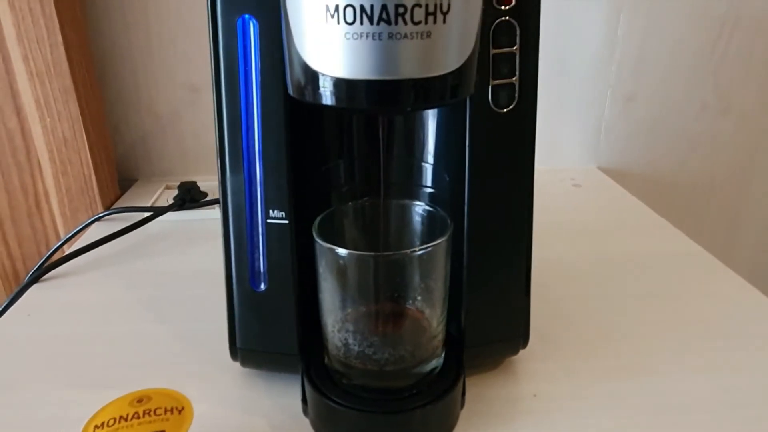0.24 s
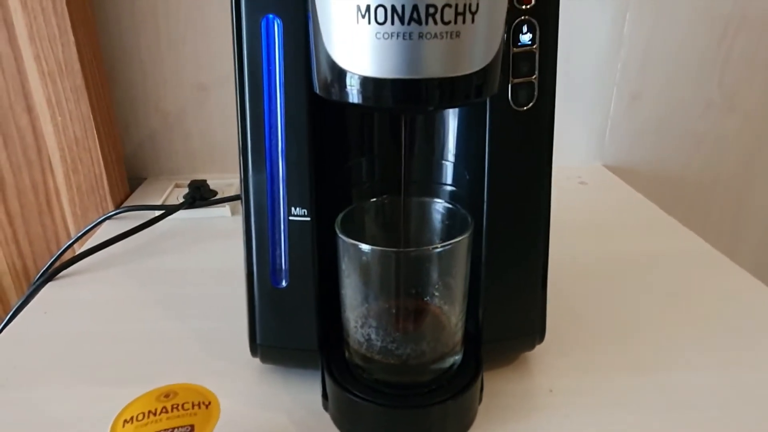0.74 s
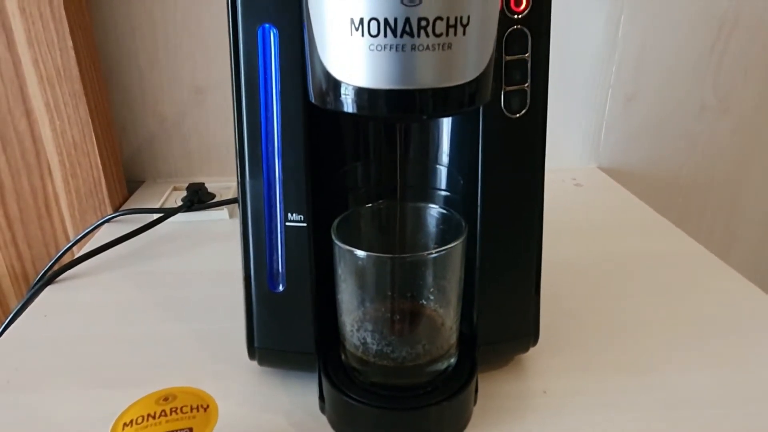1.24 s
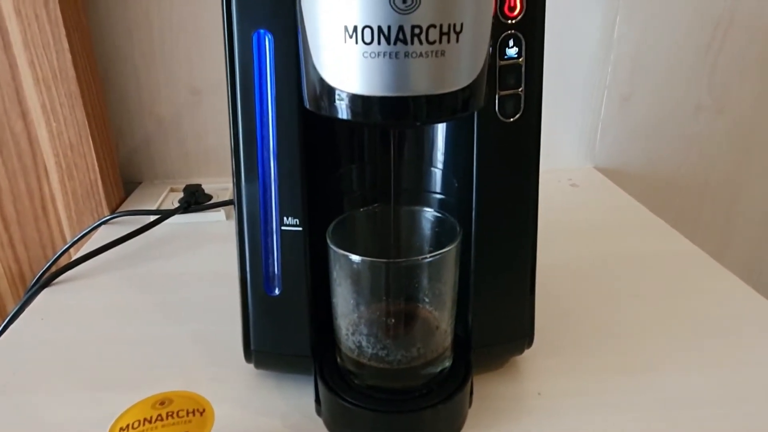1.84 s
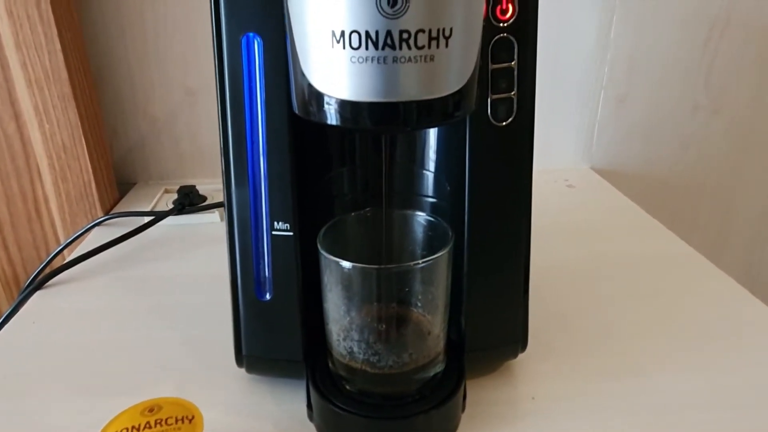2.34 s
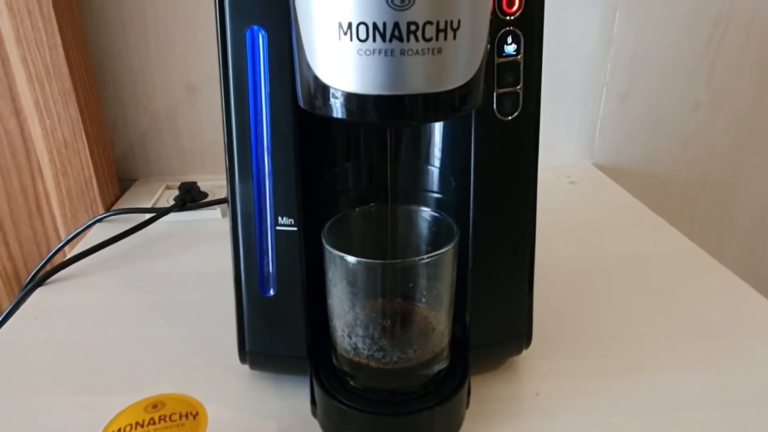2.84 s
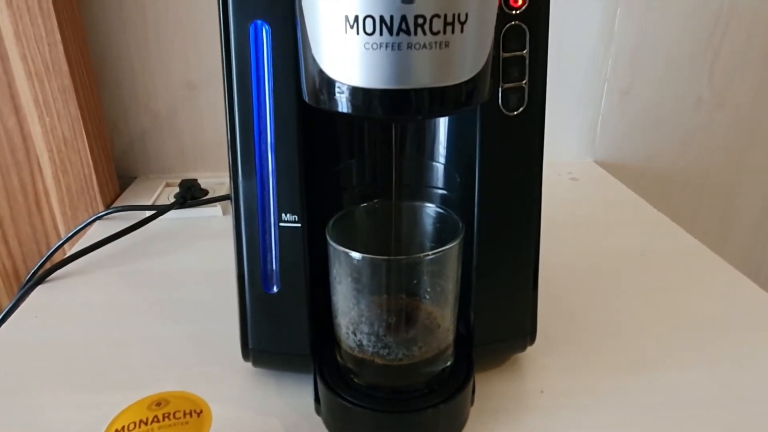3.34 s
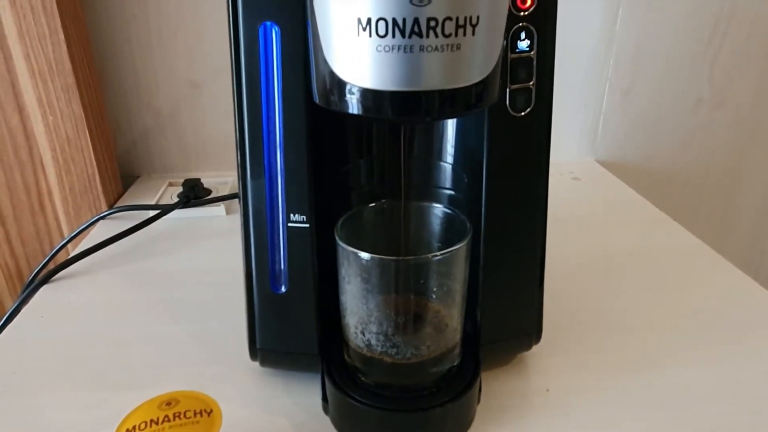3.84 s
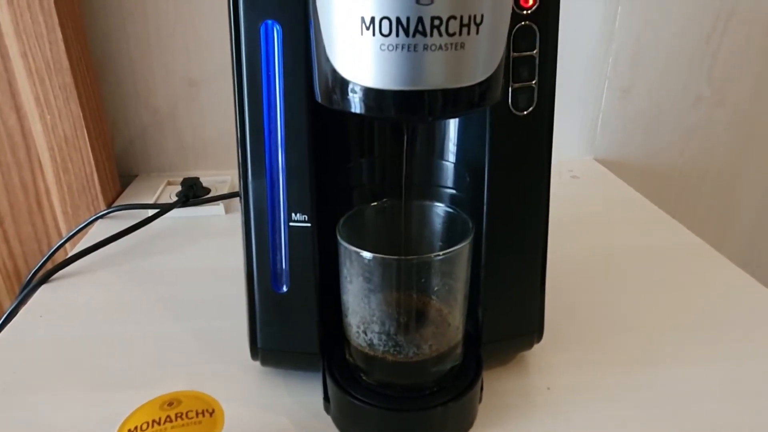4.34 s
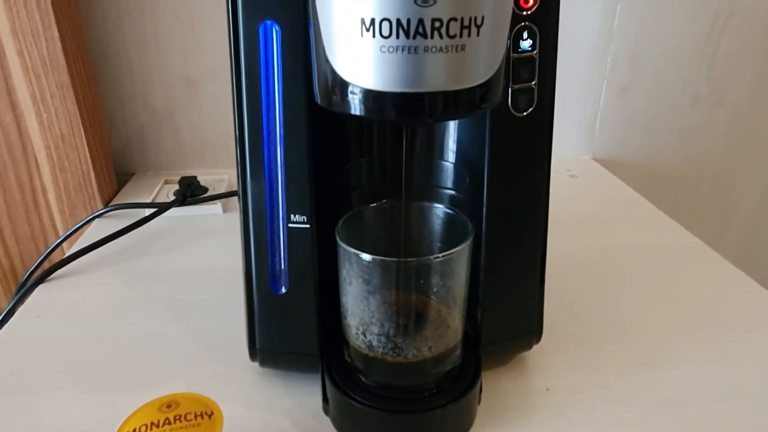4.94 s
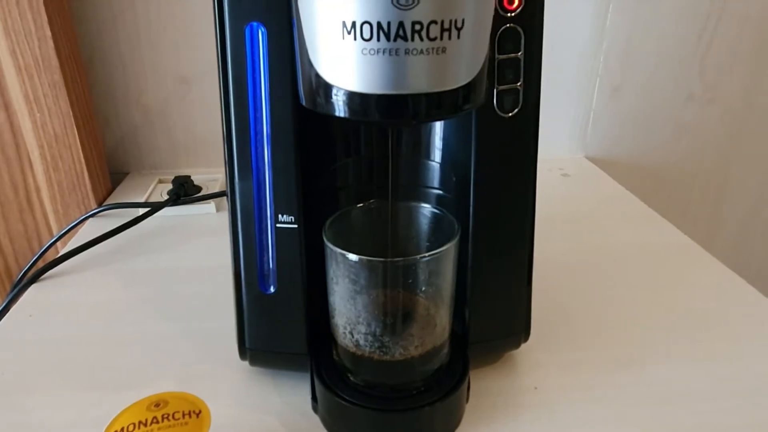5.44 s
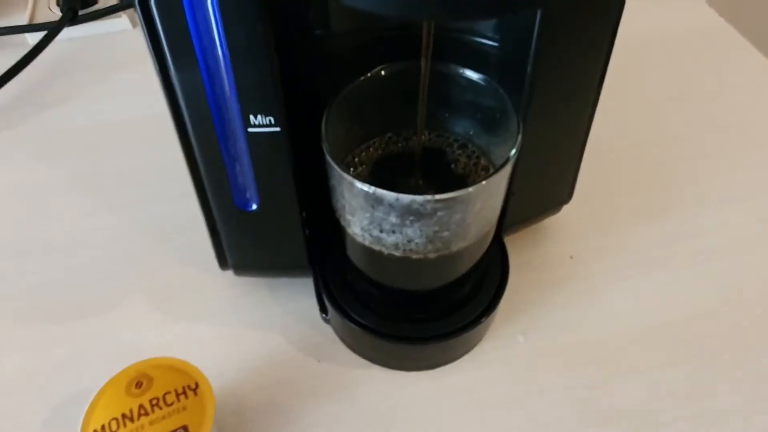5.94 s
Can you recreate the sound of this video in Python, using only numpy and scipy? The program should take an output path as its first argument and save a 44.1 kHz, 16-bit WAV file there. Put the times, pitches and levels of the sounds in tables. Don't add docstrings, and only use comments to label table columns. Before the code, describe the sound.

From 0 s, already running, a coffee machine's pump hums at a steady low pitch around 100 Hz with buzzy overtones, slightly wavering, over a soft low casing rumble. A thin stream rushes and hisses quietly into a glass. In the first second it is mostly sharp, bright spits and glassy ticks, with a strong tick near 0.4 s and another near 0.8 s. From 1 to 2.5 s scattered hollow bubble blips and small high plinks join. Around 2.8 to 3.5 s the bubbling thickens into ringing, rounded plops; a loud one comes near 4.3 s, and from 5.3 s they crowd into lively gurgling, strongest around 5.8 s, while fine crackle thins. At about 5.9 s the listening position jumps closer and lower, so hum and rumble swell suddenly, continuing with bubbles to the end just past 6 s. Close stereo, short kitchen reverberation.

```python
import sys
import numpy as np
from scipy import signal
from scipy.fft import rfft, irfft, next_fast_len
from scipy.io import wavfile

SR = 44100
rng = np.random.default_rng(int(sys.argv[2]) if len(sys.argv) > 2 else 0)


def nominal_scale(level):
    x = np.asarray(level, float) / 20
    return 10 ** x


def dump(signal):
    limited = np.clip(np.atleast_2d(signal).T, -1, 1)
    pcm = np.round(limited * 32767).astype(np.int16)
    wavfile.write(sys.argv[1], SR, pcm)


N = 272634


def rms_one(x):
    return x / np.sqrt(np.mean(x ** 2) + 1e-20)


def at_hz(points, hz):
    table_hz, values = np.array(points).T
    return np.interp(np.log(hz), np.log(table_hz), values)


def drift(rate_hz):
    r = np.exp(-80 * np.pi * rate_hz / SR)
    slow = signal.lfilter([1], [1, -2 * r, r * r], rng.standard_normal(N // 40 + 2002))
    slow = rms_one(slow[2000:])
    return np.interp(np.arange(N) / 40, np.arange(len(slow)), slow)


def resonate(x, hz, width_hz):
    r = np.exp(-np.pi * width_hz / SR)
    zeros = (1 - r * r) / 2 * np.array([1, 0, -1])
    poles = [1, -2 * r * np.cos(2 * np.pi * hz / SR), r * r]
    return signal.lfilter(zeros, poles, x + 1e-18)


def delay(x, ms):
    at = np.arange(N)
    return np.interp(at - ms * SR / 1000, at, x)


def add(track, s, shape):
    i = min(max(round(s * SR), 0), N)
    track[i:i + len(shape)] += shape[:N - i]


def after_change():
    change_s, change_time_s = 5.89, 0.023
    return np.clip((np.arange(N) / SR - change_s) / change_time_s + .5, 0, 1)


# multiple of mains, left in dB, right in dB, left lead in rad, gain after the change in dB
HUM = [(2, -34.2, -35.1, -0.02, 6), (3, -53.1, -56.2, 0.25, 11), (4, -34.8, -33.9, -0.13, 3),
       (5, -39.8, -40.5, -0.18, 1), (6, -53.1, -51.7, -0.7, 8), (7, -62.1, -58.7, -0.57, 14),
       (9, -52.5, -54.4, 1.66, -3), (10, -45.8, -50.5, -0.38, 2), (11, -47.3, -53.7, -1.02, 8),
       (12, -66.1, -58.5, 0.22, 6), (13, -65.0, -60.9, 0.91, 6), (14, -71.8, -54.3, -1.24, 9),
       (15, -58.9, -54.7, -0.75, 2), (16, -65.4, -56.7, -2.07, 6), (17, -66.9, -62.4, -0.54, 17)]


def pump():
    mains_hz, stroke_s = 49.97, 0.003474
    t, out, changed = np.arange(N) / SR, np.zeros((2, N)), after_change()
    for k, left_db, right_db, lead, changed_db in HUM:
        phase = 2 * np.pi * k * mains_hz * (t - stroke_s) + 0.052 * k * drift(2.85)
        phase += (k > 5) * rng.uniform(0, 2 * np.pi) + 0.303 * (k - 2) ** 2 * changed
        level = np.sqrt(2) * nominal_scale(min(changed_db, 6) * changed + 0.28 * k * drift(6.4))
        out[0] -= nominal_scale(left_db) * level * np.cos(phase)
        out[1] -= nominal_scale(right_db) * level * np.cos(phase - lead)
    return out


# delay in ms, level in dB.
PATHS = [
    [(.3, -15), (.71, 3), (1.33, -11), (3.1, -23)],
    [(0, -5.5), (.83, 3.5), (1.94, 4), (4.2, -4)],
]


def to_ports(x):
    return np.array([sum(nominal_scale(level_db) * delay(x, ms) for ms, level_db in side) for side in PATHS])


def bubble(hz, cycles, rise, attack_cycles):
    turn = np.arange(int(.05 * SR)) * hz / SR
    fade = (1 - np.exp(-turn / attack_cycles)) ** 2 * nominal_scale(-60 * (turn / cycles) ** 1.24)
    return fade / fade.max() * np.sin(2 * np.pi * turn * (1 + rise * turn / cycles))


# start in s, peak in dB, pitch in Hz, life in cycles.
GLUGS = [(2.79, -25.5, 1176, 16), (3.074, -15, 1270, 8.5), (3.149, -25, 1210, 10.9),
         (3.378, -16, 1090, 11.5), (3.79, -25.5, 1035, 12), (3.993, -24.5, 970, 11),
         (4.161, -21.5, 1100, 18), (4.301, -25.5, 1070, 16.3), (4.343, -12.5, 1120, 12),
         (4.481, -18.5, 1110, 7.4), (4.544, -26.5, 1180, 30), (4.701, -27, 1082, 26.5),
         (4.978, -15, 1110, 11), (5.065, -22.5, 824, 9.9), (5.329, -18, 953, 16), (5.375, -20, 1180, 7.8),
         (5.423, -15, 1130, 7.1), (5.466, -19, 1217, 15), (5.504, -19, 1010, 13), (5.527, -20.5, 1120, 16),
         (5.585, -18, 1010, 16), (5.605, -17, 1050, 22), (5.743, -14.5, 1180, 11), (5.819, -11.5, 1043, 26),
         (5.8685, -17, 1030, 14), (5.884, -16.5, 1060, 17), (5.898, -18.5, 1120, 8.7),
         (5.93, -21.5, 950, 13), (6.046, -24, 1130, 9), (6.062, -15.5, 1050, 7.9)]
# start in s, peak in dB.
RINGERS = [(1.075, -26.5), (1.213, -32.5), (1.634, -27), (1.748, -23), (1.777, -16.5), (2.444, -19.5),
           (2.586, -33), (2.78, -26.5), (2.811, -16.5), (2.825, -18.5), (2.879, -26.5), (2.922, -20.5),
           (2.956, -19), (3.019, -19.5), (3.091, -19), (3.443, -22.5), (3.515, -24.5), (3.577, -29),
           (3.64, -28.5), (3.821, -19.5), (3.841, -21.5), (3.947, -24.5), (4.403, -19), (4.87, -22.5),
           (5.141, -20.5), (5.178, -20), (5.223, -26.5), (5.487, -15), (5.626, -20.5), (5.765, -28)]
# start in s, peak in dB, pitch in Hz.
FAINT_BUBBLES = [(1.04, -38, 1520), (2.302, -31.5, 1550), (2.356, -35, 1540), (2.522, -31, 1217), (2.67, -31, 1100),
                 (2.897, -30, 1106), (2.988, -31.5, 1460), (3.041, -29, 1243), (3.175, -33, 1390),
                 (3.41, -32.5, 1123), (3.5, -35, 1270), (3.731, -30, 1180), (3.935, -33, 1520), (4.142, -35, 1520),
                 (4.239, -26.5, 1020), (4.325, -31, 1040), (4.403, -30, 810), (4.59, -28, 1130), (4.734, -27, 1095),
                 (4.773, -30, 1130), (4.941, -28.5, 962), (5.26, -32, 1520), (5.323, -22, 950), (5.55, -29, 1120),
                 (5.569, -26, 1100), (5.649, -25.5, 1000), (5.673, -28.5, 1440), (5.719, -33, 1550),
                 (6.009, -28, 1060), (6.101, -32, 1010), (1.076, -34, 1900), (1.214, -37, 1900), (1.314, -37, 1900),
                 (1.634, -31, 1920), (1.778, -28, 1170), (2.11, -37, 1880), (3.09, -33, 2050), (3.444, -32, 1950),
                 (4.43, -31, 960), (4.452, -33, 960), (4.711, -26, 1020), (5.02, -32, 1220), (5.143, -31, 1920),
                 (5.355, -31, 900), (5.91, -35, 1930), (6.165, -33, 2000)]
# start in s, peak in dB.
MURMURS = [(1.1059, -41), (1.294, -38), (1.3135, -36), (1.3738, -45), (1.4401, -45), (1.7986, -39),
           (1.924, -48), (2.1944, -37), (2.2443, -46), (2.4743, -37), (2.594, -31), (2.7155, -35),
           (2.7716, -32), (3.237, -33), (3.2546, -32), (3.3448, -42), (3.3822, -28), (3.3994, -32),
           (3.9, -35), (4.123, -36), (4.1656, -32), (4.437, -38), (4.4598, -34), (4.4817, -40),
           (4.7331, -37), (4.7596, -34), (4.791, -32), (4.8194, -37), (4.8918, -34), (5.0883, -40),
           (5.4258, -30), (5.8825, -36), (6.1604, -41)]


def large_bubbles(pops):
    large = [*GLUGS, *[(s, peak_db, 1463, 9.4) for s, peak_db in RINGERS]]
    shed = []
    for (s, peak_db, hz, _), (wait, size, pitch) in zip(large, rng.random((len(large), 3))):
        shed.append((s + .05 * (0.1176 + wait), peak_db - 14 - 5 * size, hz * (.85 + .2 * pitch), 14))
    faint = [(*row, 15.3) for row in FAINT_BUBBLES]
    murmurs = [(s, peak_db, 1620, 11.7) for s, peak_db in MURMURS]
    for s, peak_db, hz, cycles in [*large, *shed, *faint, *murmurs]:
        ring = bubble(0.924 * hz, max(cycles, 3), rise=0.17, attack_cycles=1.1)
        add(pops, s - .0008, nominal_scale(peak_db - 2.0) * ring)


# start in s, peak in dB, pitch in Hz.
PLINKS = [(0.21, -36.5, 3000), (0.5426, -32, 3140), (0.667, -37, 3130), (0.8844, -35, 2800),
          (0.974, -27, 2860), (1.632, -31.5, 2980), (1.834, -24.5, 2863), (2.012, -36, 3130),
          (2.111, -27, 3580), (2.3496, -34, 4000), (2.594, -35, 3700), (3.042, -25, 3210),
          (3.2552, -27.5, 3800), (3.3445, -32.5, 3180), (3.411, -30, 3300), (3.445, -22.5, 3356),
          (3.8195, -34.5, 3710), (3.951, -32.5, 3080), (4.2904, -32, 2730), (4.6456, -30.5, 2886),
          (4.788, -32, 3820), (5.128, -22, 3400), (5.2083, -28, 3160), (5.2625, -30.5, 3500),
          (5.3744, -31, 3190), (5.3994, -32, 3260), (5.467, -33.5, 3760), (5.5682, -32, 3370),
          (5.7019, -31.5, 3600), (5.8177, -34, 3600)]
# start in s, peak in dB, pitch in Hz.
BEADS = [(0.3102, -35, 3060), (0.3651, -38.5, 3760), (0.825, -43, 2770), (1.074, -35, 2590),
         (1.1307, -37, 3190), (1.4336, -37, 3170), (1.4526, -39.5, 3070), (1.4825, -34, 2590),
         (1.6229, -35, 3160), (1.7474, -36, 2940), (1.8026, -36, 3670), (2.2648, -34, 3200),
         (2.3082, -42, 3560), (2.81, -38, 2800), (2.9552, -34, 2970), (3.0191, -37, 2970),
         (3.2385, -36, 3920), (3.6825, -37.5, 3220), (3.9729, -34, 3300), (4.0332, -42, 2820),
         (4.1175, -42, 3010), (4.4029, -41, 2970), (4.5089, -39, 2990), (4.7132, -39, 3460),
         (4.7725, -36, 3060), (4.8692, -36, 2950), (5.6495, -33.5, 3680), (5.7648, -35, 3200),
         (5.887, -39, 3120), (6.0449, -37, 3400)]


def small_bubbles(pops):
    beads = [(s, peak_db - 1.5, hz) for s, peak_db, hz in BEADS]
    for s, peak_db, hz in [*PLINKS, *beads, (3.446, -27, 4300)]:
        add(pops, s, nominal_scale(peak_db + 3.0) * bubble(0.949 * hz, 18.7, rise=0.22, attack_cycles=0.33))


def bubble_patter(pops):
    for when, pitch, size in rng.random((600, 3)):
        s = when ** .7 * N / SR
        peak_db = -52.5 + 1.57 * s - 4.8 * np.log(size + 0.02)
        add(pops, s, nominal_scale(peak_db) * bubble(900 * 4.5 ** pitch ** 2.2, 5.7, rise=0.07, attack_cycles=0.66))


# pitch in Hz, width in Hz, left in dB, right in dB.
BAY = [(787, 31, 1, 7.5), (1011, 45, -35, 1.5), (1180, 153, -1, -1), (1520, 85, 3.5, 11),
       (1862, 80, 5.5, 9), (2860, 78.4, 6, -13), (3190, 130, -12, 6.5), (3600, 190, 0.5, -13),
       (4180, 41, -2, -7.5)]


def gurgle():
    pops = np.zeros(N)
    large_bubbles(pops)
    small_bubbles(pops)
    bubble_patter(pops)
    churn_db, flicker_db = -52, 5.5
    stirred = pops + nominal_scale(churn_db + flicker_db * drift(31)) * rng.standard_normal(N)
    ring = np.zeros((2, N))
    for hz, width_hz, left_db, right_db in BAY:
        ring += resonate(stirred, hz, width_hz) * nominal_scale([[left_db], [right_db]])
    late = delay(pops, 0.22)
    left = late - 0.21 * resonate(late, 900, 400)
    return nominal_scale(-3.5) * np.array([left, pops]) + ring + nominal_scale(-13.5) * to_ports(pops), pops


def spit(noise, hz, treble_db, ms):
    age = np.arange(len(noise)) / (ms * SR / 1000)
    slow = age * nominal_scale(0.18 * (treble_db + 2))
    high = signal.butter(4, 2000 + 0.39 * hz, "high", fs=SR, output="sos")
    tick = signal.sosfilt(high, noise * age ** 2 * np.exp(-2.2 * age))
    puff = noise * slow ** 2 * np.exp(-1.7 * slow)
    core = resonate(resonate(puff, hz, 0.2 * hz), hz, 0.2 * hz)
    shape = rms_one(core) + nominal_scale(treble_db + 17.0) * rms_one(tick)
    return shape / np.abs(shape).max()


# start in s, peak in dB, centre in Hz, treble share in dB.
SPITS = [(0.063, -26, 6340, -14), (0.2104, -34, 5730, -13), (0.3102, -29, 5180, -19),
         (0.528, -29.5, 5600, -16), (0.5761, -28.5, 9200, -31), (0.5926, -23.5, 6820, -7),
         (0.6674, -30, 6640, -19), (1.0068, -31, 5050, 2), (1.1313, -31, 7490, 0), (1.478, -28, 8550, -5),
         (1.7759, -33, 7730, -14), (1.8038, -30, 5750, -11), (1.8332, -29.5, 6400, -18),
         (1.9508, -22, 8950, -19), (2.108, -30, 6230, -10), (2.5731, -34, 5630, -14),
         (2.9552, -35, 7700, -10.5), (2.9881, -31, 6660, -6), (3.345, -29, 5050, -41),
         (3.6147, -36, 5650, -10.5), (3.681, -24, 5620, -51), (3.787, -29.5, 5910, -41.5),
         (3.9459, -28, 5120, -11), (4.2896, -29.5, 8750, -26), (4.456, -31.5, 8460, -28),
         (4.9455, -37, 6400, -25), (5.3325, -32.5, 6550, -9), (5.465, -32.5, 6100, -27.5),
         (5.6735, -33.5, 7700, 3), (5.8182, -30.5, 5700, 1), (0.375, -25, 7300, -10),
         (0.7645, -25, 7900, -12), (0.069, -36, 6000, -6), (1.622, -35, 7600, -10)]
# start in s, peak in dB, centre in Hz.
TICKS = [(0.1825, -25, 13100), (0.3738, -11, 13600), (0.4484, -26.5, 11600), (0.4824, -28, 13200),
         (0.7951, -27, 11600), (0.7635, -13, 13000), (0.8247, -32, 11700), (0.8919, -32, 13400),
         (1.0256, -31, 13900), (1.058, -26, 13700), (1.2865, -26, 13660), (1.5035, -28, 15000),
         (1.623, -23, 15400), (1.9754, -33.5, 15500), (2.0632, -32, 11600), (2.3492, -24.5, 11400),
         (2.4149, -31.5, 11500), (2.465, -30, 15400), (2.5331, -33, 14000), (2.5426, -31, 11600),
         (2.6263, -31, 11600), (2.7077, -34, 11400), (3.82, -31, 11600), (3.8906, -34, 15600),
         (4.787, -26, 13100), (5.1093, -23, 15500), (5.4226, -31.5, 11600), (5.4475, -30, 13900),
         (6.0444, -33, 12200), (6.0787, -28, 11300)]
# start in s, peak in dB, centre in Hz.
SPRAY = [(0.0912, -43, 10700), (0.2967, -40, 7640), (0.3401, -44, 13500), (0.6544, -40, 7750),
         (0.7063, -46, 11500), (0.7367, -45, 12600), (0.8849, -41, 13400), (0.9415, -44, 13400),
         (0.9687, -48, 7550), (1.1802, -40, 13300), (1.4521, -39.5, 7890), (1.5244, -39, 13500),
         (1.5848, -41, 7700), (1.7265, -36, 9280), (1.7459, -38, 8110), (1.8562, -45, 15500),
         (1.8796, -44.5, 11600), (2.0492, -43, 11500), (2.0862, -44.5, 11700), (2.1939, -51, 15400),
         (2.2977, -42, 7810), (2.389, -42, 11500), (2.4912, -40, 11500), (2.593, -39, 12800),
         (2.7636, -40, 15400), (3.3902, -49, 11600), (3.4103, -45, 7590), (3.4436, -44, 11600),
         (3.4875, -50, 12900), (3.6282, -39, 11400), (3.9728, -41, 7780), (4.0537, -42, 8950),
         (4.4024, -48, 7860), (4.559, -45, 11500), (4.9771, -43, 12700), (5.6206, -41, 11600)]
# pitch in
# Hz, # width in Hz, level in dB.
DROP_MODES = [(6050, 67, -6), (7350, 95, -12.5), (11600, 160, -4), (12600, 260, -1.5), (13600, 140, -11),
              (15400, 280, -11)]


def spatter():
    ticks = np.zeros(N)
    droplets = [(*row, -12) for row in TICKS]
    spray = [(s, peak_db + 5, hz, -13.5) for s, peak_db, hz in SPRAY]
    clear = [*SPITS, *droplets, *spray]
    for (s, peak_db, hz, treble_db), noise in zip(clear, rng.standard_normal((len(clear), 900))):
        burst = spit(noise, hz, treble_db, ms=0.62 - 0.039 * hz / 1000)
        add(ticks, s - .0004, nominal_scale(peak_db + 1.0) * burst)
    for (when, pitch, size), noise in zip(rng.random((260, 3)), rng.standard_normal((260, 400))):
        peak_db = -51.5 - 3.1 * np.log(size + 0.014)
        add(ticks, when ** 1.6 * N / SR, nominal_scale(peak_db) * spit(noise, 5000 * 3 ** pitch, -13.5, ms=0.39))
    ringing = sum(nominal_scale(level_db + 7.0) * resonate(ticks, hz, 1.7 * width_hz) for hz, width_hz, level_db in DROP_MODES)
    return to_ports(0.52 * ticks + ringing), ticks + ringing


# frequency in Hz, likeness from -1 to 1.
LIKENESS = [(35, 0.89), (100, 1), (270, 0.74), (500, 0.2), (1100, 0.95), (2500, 0.041), (6000, 0.095),
            (15000, 0.071)]
# frequency in Hz, left minus right in dB.
LEAN = [(60, -5), (99, 3), (160, -2), (270, 1.5), (450, -3.5), (740, 0), (1220, -2.5), (2010, 5.5),
        (3330, 6.5), (5500, 13), (9080, -2), (15000, 13.5)]


def banded_noise(spectrum, shared_db, own_db):
    out, together = 0, drift(19)
    lowest_hz, highest_hz = spectrum[0][0], spectrum[-1][0]
    edges = lowest_hz * 2 ** np.arange(0, np.log2(highest_hz / lowest_hz), .4)
    white = rng.standard_normal((2, 2, N))
    for k, (low, high) in enumerate(zip(edges, edges[1:])):
        band = signal.butter(2, [low, high], "band", fs=SR, output="sos")
        mid, side = signal.sosfilt(band, white[k % 2])
        hz = np.sqrt(low * high)
        alike = np.clip(at_hz(LIKENESS, hz), -1, 1)
        lean = at_hz([(45, -.4), *LEAN], hz) / 2
        gain = nominal_scale(at_hz(spectrum, hz) + shared_db * together + own_db * drift(22))
        pair = np.sqrt(1 + alike) * mid + np.sqrt(1 - alike) * side * [[1], [-1]]
        out = out + gain * pair * nominal_scale(np.array([[lean], [-lean]]))
    out[0] = delay(out[0], 0.308)
    return out * np.sqrt(SR / 2)


# frequency in Hz, density in dB per Hz.
RUMBLE = [(20, -93), (32, -70), (50, -64), (80, -68.5), (130, -67.5), (220, -68), (340, -73), (420, -74.5),
          (900, -100)]


def casing():
    rumble = banded_noise(RUMBLE, shared_db=-0.2, own_db=-0.3)
    boom = nominal_scale(-22.5) * resonate(rng.standard_normal(N), 343.4, 27.0)
    return (rumble + boom) * nominal_scale(4.2 * after_change())


# frequency in Hz, density in dB per Hz.
RUSH = [(250, -100), (420, -75.5), (600, -74), (800, -79), (1100, -76.5), (1600, -78.5), (2400, -94.5),
        (3100, -88), (4400, -97), (4900, -101), (9000, -110)]
# frequency in Hz, relative density in dB per Hz.
HISS = [(3500, -20), (5000, -16), (7500, 3.5), (9000, -7.5), (11600, -6), (13500, -7), (15500, -4),
        (20500, -18)]


def stream():
    rush_db, hiss_db = 1, -59
    rush = nominal_scale(rush_db + 0.35 * after_change()) * banded_noise(RUSH, shared_db=1.3658, own_db=1.56)
    in_glass = nominal_scale(rush_db - 42.0) * resonate(rng.standard_normal((2, N)), 2844, 420)
    in_spout = resonate(resonate(rng.standard_normal((2, N)), 4250, 530), 4250, 530)
    hiss = nominal_scale(hiss_db) * rms_one(banded_noise(HISS, shared_db=2.0, own_db=2.0))
    return rush + in_glass + nominal_scale(rush_db - 48.0) * in_spout + hiss


# delay in ms, feedback as a factor.
SCATTER = [(1.7, -0.27), (3.9, 1.26), (7.3, 1.5)]


def kitchen(x):
    t60_s, wall_cut_hz, room_db = 0.33, 15000, -13.5
    size = next_fast_len(N + SR)
    turn = np.exp(-2j * np.pi * np.arange(size // 2 + 1) / size)
    dull = np.exp(-2 * np.pi * wall_cut_hz / SR)
    out = np.zeros((2, len(turn)), complex)
    for k, lag in enumerate((rng.uniform(.011, .034, 16) * SR).astype(int)):
        loss = nominal_scale(-60 * lag / SR / t60_s) * (1 - dull) / (1 - dull * turn)
        loop = loss * np.exp(lag * np.log(turn))
        out[k % 2] += loop / (1 - loop) * (-1) ** (k // 2)
    for ms, back in SCATTER:
        late = np.exp(int(ms * SR / 1000) * np.log(turn))
        out = out * (late - back) / (1 - back * late)
    return nominal_scale(room_db) * irfft(out * rfft(x, size), size)[:, :N]


def scene():
    bubbles, pops = gurgle()
    drops, ticks = spatter()
    return pump() + bubbles + drops + casing() + stream() + kitchen(pops + nominal_scale(-3.0) * ticks)


def band_limit(x):
    return signal.sosfilt(signal.butter(12, 16520, fs=SR, output="sos"), x)


def record(dry):
    low_pass = signal.cheby2(16, 40, 16050, fs=SR, output="sos")
    return band_limit(signal.sosfilt(low_pass, dry))


dry = scene()
out = record(dry)
dump(out)
```